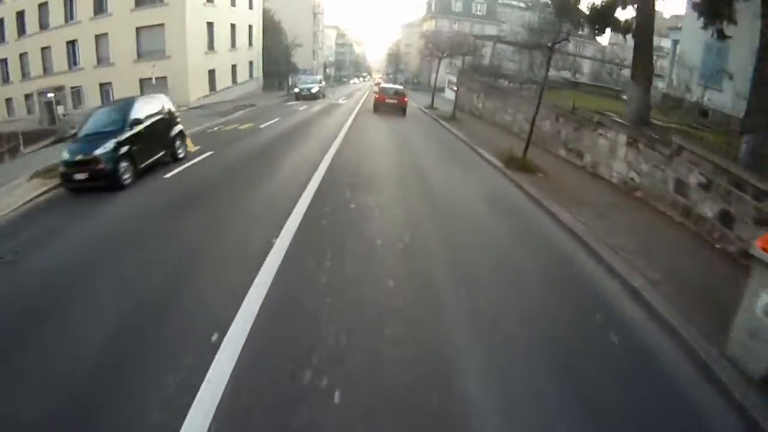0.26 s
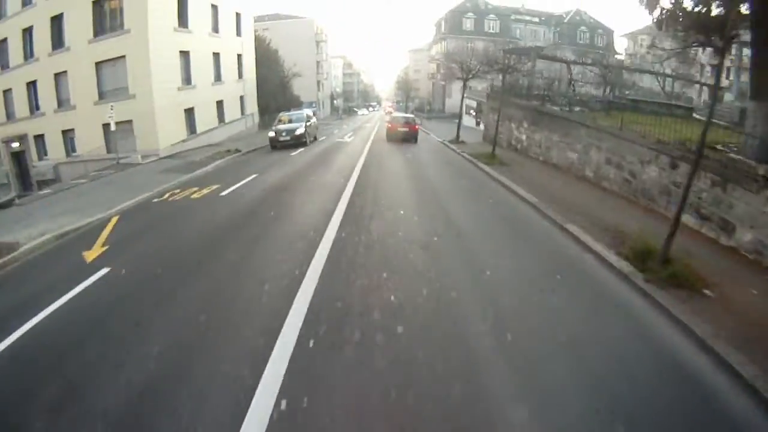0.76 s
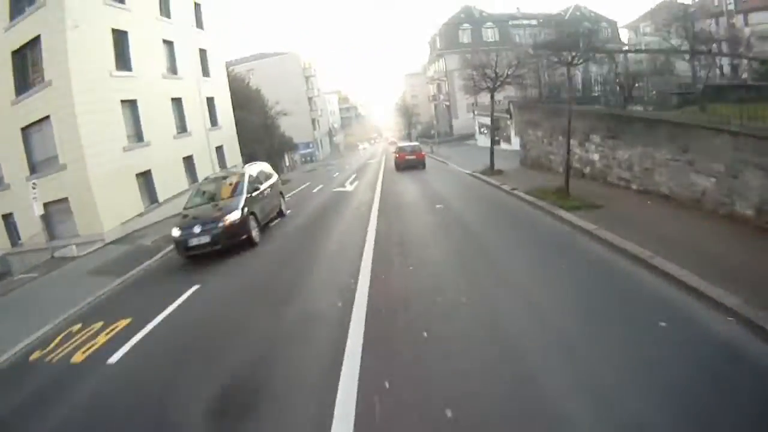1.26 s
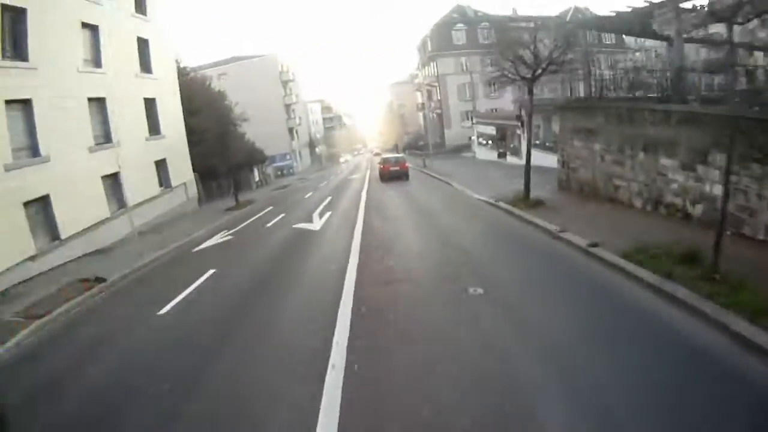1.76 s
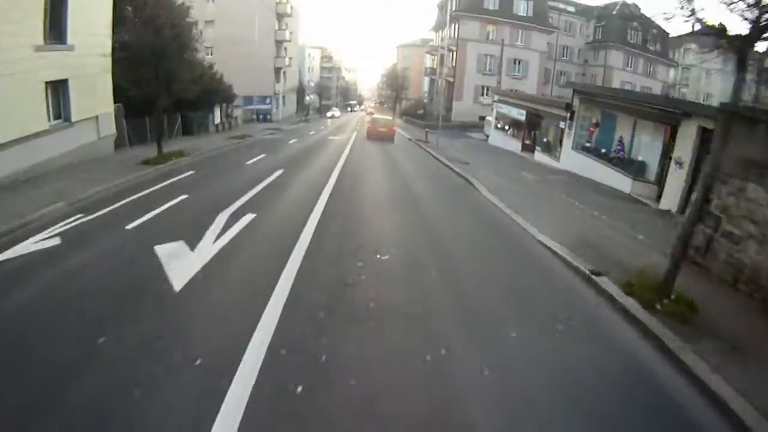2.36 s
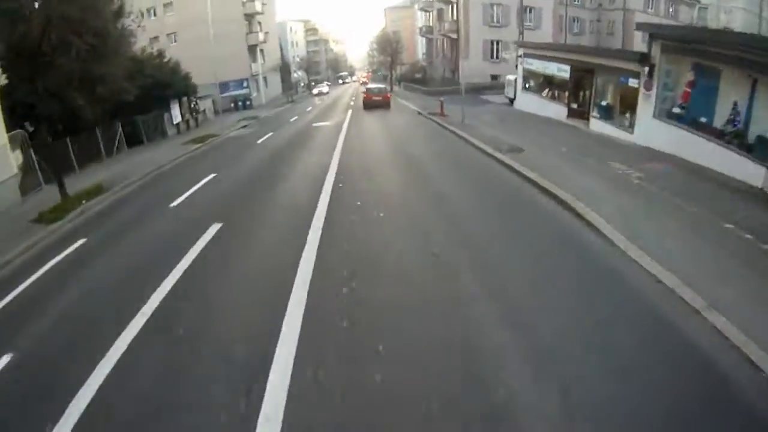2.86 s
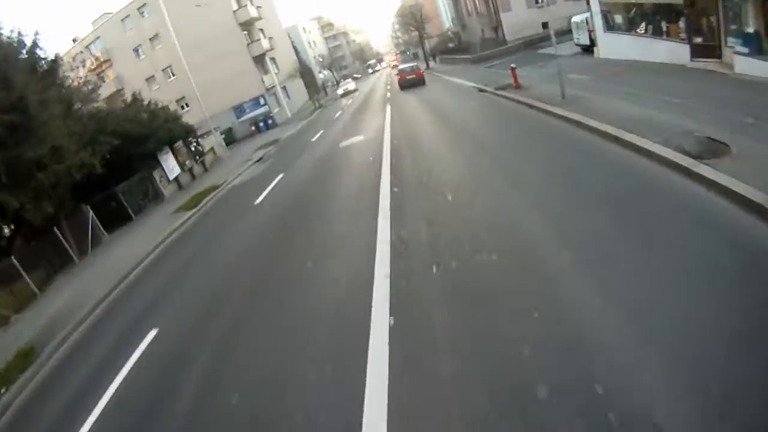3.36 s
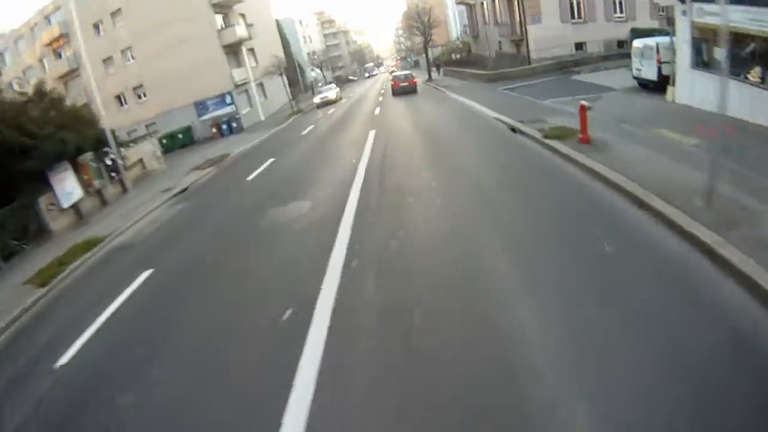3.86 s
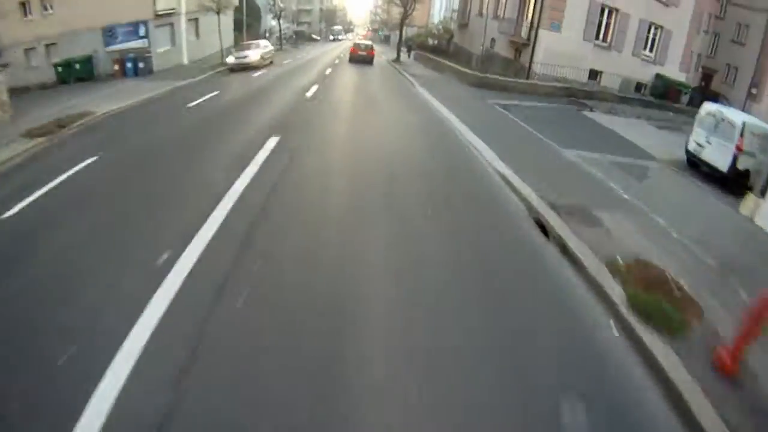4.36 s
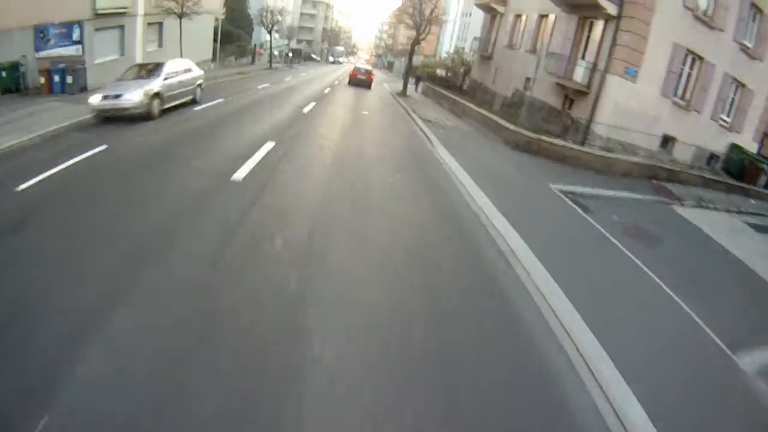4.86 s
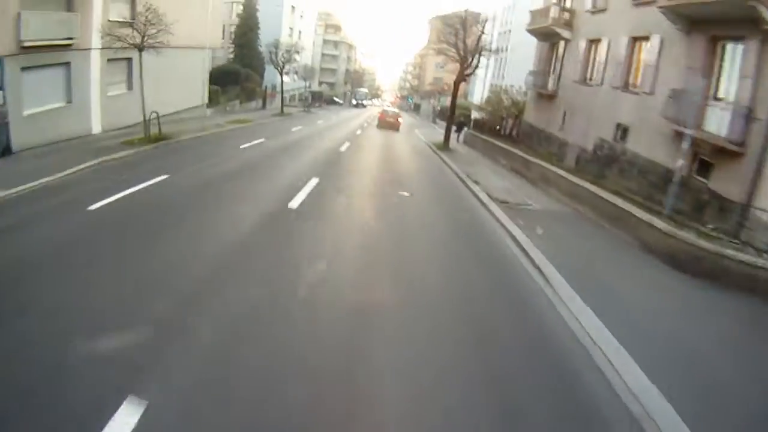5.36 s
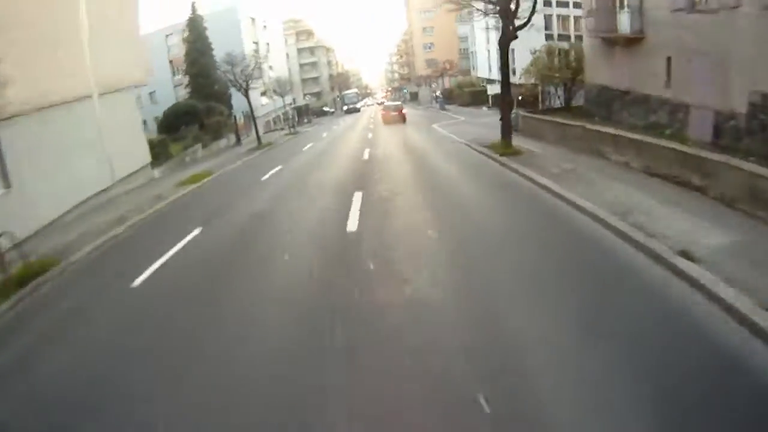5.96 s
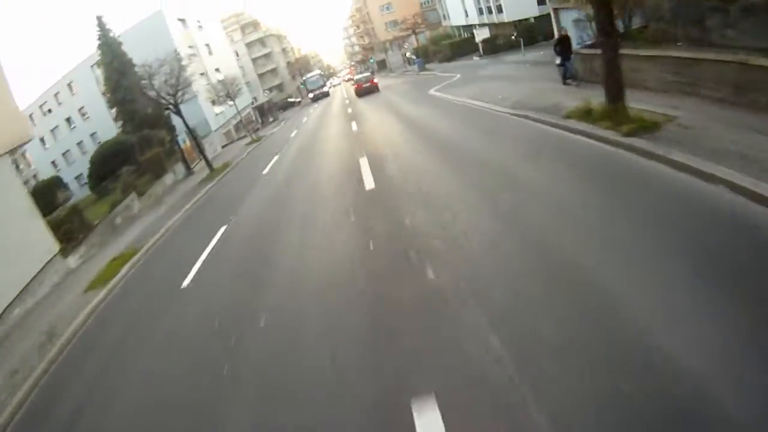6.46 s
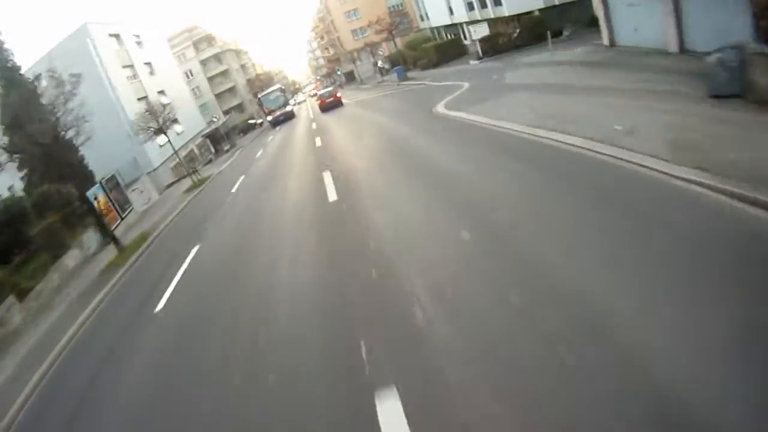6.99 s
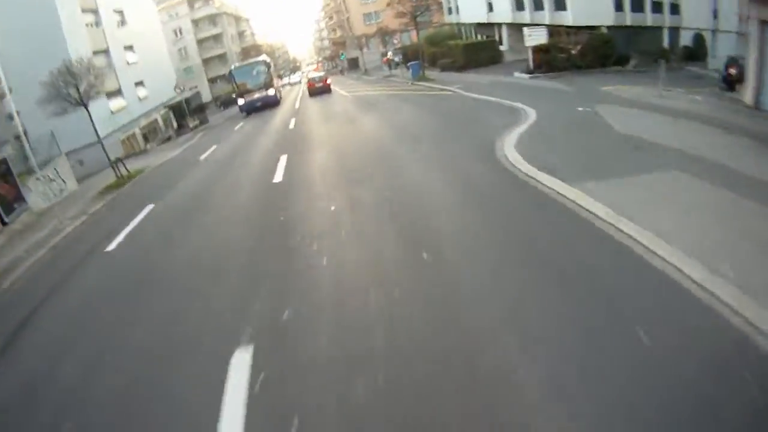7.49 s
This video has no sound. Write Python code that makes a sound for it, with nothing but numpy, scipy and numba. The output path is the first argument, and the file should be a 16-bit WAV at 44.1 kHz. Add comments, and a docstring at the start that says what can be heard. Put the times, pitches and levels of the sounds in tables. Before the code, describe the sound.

A continuous fast ride on small hard wheels down an open city street, heard through a closed case on the rider's helmet. Boxy, low wind buffeting fills the whole stretch, with a thin hiss of wheels on asphalt and a faint fuzzy whistle that slowly fades. Two plastic knocks rattle at about 0.2 s, more near 1.1 s. The wheel hiss grows after 1 s, and a traffic roar swells and sinks around 2 s. A dull, strong knock lands at 2.7 s. Gusts punch from 2.8 s, the hardest at 3.35 s, then 4.6 and 4.85 s, briefly ducking the sound. Rattles crowd together from 5 to 5.5 s; the loudest clack hits at 6.05 s. Fainter traffic swells come near 5.7 and 7.25 s. Wheel hiss strengthens around 6.3 to 6.6 s, and several gusts thump near 7.5 s before the wind eases at the end.

```python
"""Wind buffets a closed camera case on the helmet of a skater rolling fast down an asphalt street.
It is shaped noise plus single pushes for hard gusts; air past a slit adds a fuzzy, fading whistle.
Wheels and swells of traffic roar are noise hissing through the case; the loose mount rattles as ringing blows.
Loud peaks, as in hard gusts, pull the gain control down.
The converter holds every sample, which mirrors the sound in the treble."""
import sys
import numpy as np
from scipy import signal
from scipy.io import wavfile
from scipy.ndimage import uniform_filter1d
from numba import njit

SR = 44100
rng = np.random.default_rng(int(sys.argv[2]) if len(sys.argv) > 2 else 0)


def pcm_store(signal):
    """Save signal as 16-bit PCM."""
    levels = np.round(np.clip(np.atleast_2d(signal), -1, 1) * 32767)
    wavfile.write(sys.argv[1], SR, levels.astype(np.int16).T)


def makeup_ratio(level_db):
    """Linear amplitude ratio for a level in decibels (20 dB per factor of ten)."""
    decades = np.asarray(level_db, float) / 20
    return 10 ** decades


N = 340893  # length of the scene in samples


def read(points, hz):
    """Reads a spectrum table at any pitch, with straight lines over log frequency."""
    table_hz, value = np.transpose(points)
    return np.interp(np.log(hz + 1), np.log(table_hz + 1), value)


def evened(x):
    """Scales a signal to an rms (average strength) of 1."""
    return x / np.sqrt(np.mean(x ** 2) + 1e-20)


def add(mix, s, sound):
    """Mixes a sound in, starting at s seconds."""
    part = mix[max(round(s * SR), 0):][:len(sound)]
    part += sound[:len(part)]


def noise(spectrum, patchy_db, lumpy_db, lump_s):
    """Random short-time spectra with drifting patches, times lumps of loudness shared by all pitches."""
    frames, hz = N // 256 + 5, np.fft.rfftfreq(1024, 1 / SR)
    real, imaginary, patches = rng.standard_normal((frames, 513, 3)).T
    patches = uniform_filter1d(patches, size=8, axis=0)  # smooth over pitch
    patches = evened(uniform_filter1d(patches, size=10, axis=1))  # smooth over time
    level_db = read(spectrum, hz)[:, None] + patchy_db * patches
    spectra = (real + 1j * imaginary) * makeup_ratio(level_db)
    hiss = signal.istft(spectra, nperseg=1024, noverlap=768)[1][:N]
    smoothing = np.poly([np.exp(-1 / (lump_s * SR))] * 2)
    lumps = evened(signal.lfilter([1], smoothing, rng.standard_normal(N)))
    return evened(hiss * makeup_ratio(lumpy_db * lumps))


def ride(index):
    """How one level column of the ride moves over time, as a gain."""
    # the ride: (time [s], wind pressure on the case [dB], wheel hiss [dB])
    ride_rows = [(0.0, -20, -37), (0.39, -19, -37.5), (0.82, -16.5, -36), (1.38, -16, -32),
                 (2.07, -18, -32), (2.88, -16.5, -32.5), (3.31, -18, -34.5), (3.51, -14.5, -35),
                 (3.72, -18.5, -37), (4.5, -16.5, -34.5), (5.06, -16.5, -37), (5.47, -16.5, -35),
                 (6.29, -15.5, -31), (6.61, -13, -31), (6.8, -18, -36), (7.28, -13, -33),
                 (7.47, -15, -35.5), (7.6, -21.5, -44)]
    columns = np.transpose(ride_rows)
    return makeup_ratio(np.interp(np.arange(N) / SR, columns[0], columns[index]))


def wind():
    """Eddies beat on the case; the hardest are single pushes with suction around them."""
    # shape of the buffeting noise: (frequency [Hz], level [dB per Hz])
    buffet = [(15, -12), (40, -1.5), (80, -0.5), (160, -5), (300, -9), (520, -12), (650, -16.5), (780, -25),
              (1000, -32.5), (2000, -55), (6000, -66)]
    # spells when large eddies swell or fail: (middle [s], half-length [s], change of deep rumble [dB])
    eddies = [(0.547, 0.31, 5.5), (2.07, .2, -2), (3.31, 0.083, 8), (4.154, 0.11, -14), (6.0, .3, -3.5),
              (5.001, 0.16, 7), (6.6, 0.099, -9), (7.303, 0.17, -1)]
    # hard gusts: (time [s], pressure [signed amplitude], half-width [ms], suction before [share])
    gusts = [(0.8119, 0.7, 2.1, .3), (2.8086, 0.66, 1.6, .3), (3.1033, .5, 4.1, 0.16),
             (3.2048, 1.16, 1.34, .3), (3.3473, 4.5, 1.73, 0.11), (3.732, 0.3, 1.9, 0.45),
             (4.517, 1.07, 2.35, 0.7), (4.5932, 2.5, 1.67, .1), (4.8471, 2, 1.66, 0.34),
             (5.2317, 0.86, 1.8, 0.34), (5.37, 0.6, 1.5, .1), (6.3107, 1, 2.4, 0.21),
             (6.8226, 1.05, 1.6, 0.52), (7.166, -0.4, 1.4, .3), (7.502, 0.67, 1.8, 0.32),
             (7.5284, -1.1, 1.74, 0.73), (7.561, 0.9, 2.1, .58), (7.675, 1, 1.57, 0.42)]

    out = ride(index=1) * noise(buffet, patchy_db=1.0, lumpy_db=0.5, lump_s=0.0051)
    low_pass = signal.butter(2, 90, fs=SR, output="sos")
    rumble = signal.sosfilt(low_pass, out)
    now = np.arange(N) / SR
    deep_db = sum(db * np.exp(-((now - s) / span) ** 2) for s, span, db in eddies)
    out = out + (makeup_ratio(deep_db) - 1) * rumble  # large eddies come and go on their own

    t = np.arange(-SR // 50, SR // 20) / SR
    for s, pressure, width_ms, before in gusts:
        u = t / width_ms * 1000  # time counted in gust widths
        push = np.exp(-u ** 2)
        suction = before * np.exp(-(u + 1.71) ** 2)
        # the membrane swings back: a soft start, then a slow return
        swing = 0.32 * np.exp(-np.maximum(u - 1.6, 0) / 5.3) / (1 + np.exp(-3 * (u - 1.6)))
        add(out, s + t[0], pressure * (push - suction - swing))
    return out


def whistle():
    """Air past a slit of the case blows a fuzzy tone that slowly fades."""
    hz, width_hz = 2150, 260
    start_db, fade_db_per_s = -40, -1.4
    slit = [(hz - 2 * width_hz, -30), (hz - width_hz / 2, -3), (hz, 0),
            (hz + width_hz / 2, -3), (hz + 2 * width_hz, -30)]
    level = makeup_ratio(start_db + fade_db_per_s * np.arange(N) / SR)
    return level * noise(slit, patchy_db=2.4, lumpy_db=1.0, lump_s=0.0048)


def road():
    """Small hard wheels hiss on the grain of the asphalt."""
    # wheel hiss as it comes through the case: (frequency [Hz], level [dB per Hz])
    wheel_hiss = [(470, -22), (800, -4.5), (1070, -8.5), (1370, -7), (1610, -9.5), (2200, -8.5), (2520, -8),
                  (3010, -4), (3550, -12.5), (3750, -10), (4000, -18.5), (5030, -19.5), (5510, -22),
                  (6000, -30), (7800, -64)]
    return ride(index=2) * noise(wheel_hiss, patchy_db=0.77, lumpy_db=1.04, lump_s=0.012)


def knock(db, bright_db, chance):
    """A scraping blow a few ms long rings the modes (natural tones) of the case."""
    # case modes: (frequency [Hz], level [dB], time to fall 60 dB [s], share of the brightness [factor])
    case_modes = [(1037, -6, 0.018, 1.5), (1334, 3, 0.015, 0.55), (1950, -4.5, 0.011, 1.15),
                  (2408, 4, 0.0071, 1.14), (3150, -8, 0.011, 1.14), (3740, -13, 0.0059, 0.83),
                  (4330, -19.5, 0.022, 0.83)]
    detune = 0.027  # typical pitch shift as a share: no two blows flex the case quite alike
    t = np.arange(len(chance)) / SR
    u = t / 0.0024
    blow = chance * u * np.exp(-2.5 * u)
    out = np.zeros(len(t))
    for k, (hz, mode_db, t60, share) in enumerate(case_modes):
        # each mode builds up before it dies away
        swell = makeup_ratio(-60 * t / t60) * (1 - np.exp(-t / (0.13 * t60)))
        bent_hz = hz * (1 + detune * chance[-1 - k])
        tone = swell * np.sin(2 * np.pi * bent_hz * t)
        ring = signal.fftconvolve(blow, tone)[:len(t)]
        out += makeup_ratio(mode_db + share * bright_db) * ring / abs(ring).max()
    return makeup_ratio(db) * out


def mount():
    """The loose mount gives clear knocks with one rebound each, and faint random ones between them."""
    # clear knocks: (time [s], level [dB], brightness [dB])
    knocks = [(0.1944, -8.5, -10), (0.2593, -10.5, -11.5), (0.572, -22.5, -10), (1.0027, -20.5, -4.5),
              (1.0644, -12, -14), (1.1094, -24, -10), (1.1523, -26, -15), (1.392, -16, -8),
              (1.7414, -17, -10), (1.8951, -16.5, -8), (1.9782, -21.5, -5), (2.1328, -25, 3.5),
              (2.4198, -15.5, -2.5), (2.4412, -26.5, 1), (2.5014, -22.5, 1.5), (2.509, -21, -5),
              (2.6433, -10.5, -21), (2.673, -5, -23), (2.952, -21.5, -1), (2.96, -22.5, 4),
              (3.02, -26, -12), (3.0747, -26, -4), (3.081, -24.5, -2), (3.3194, -30, -3), (3.326, -23, -4),
              (3.8382, -20, -8), (4.338, -20, -11), (4.358, -26, -5), (4.5628, -20, -7), (4.805, -17.5, -4),
              (4.874, -19, -2.5), (5.0053, -18.5, -4.5), (5.0405, -17, -17), (5.077, -22.5, -5),
              (5.114, -16.5, -7.5), (5.1987, -13, -11), (5.2967, -16.5, 3), (5.2985, -11, -8),
              (5.3097, -17, -12), (5.325, -24, 3.5), (5.341, -20, -7), (5.3613, -18, -5.5),
              (5.4871, -12.5, -5.5), (5.513, -21, -10.5), (5.6622, -14, -15), (5.894, -16, -7),
              (5.9165, -22.5, 0), (5.9748, -21, -10), (6.044, -0.5, -11), (6.076, -19, -12),
              (6.138, -19, -4.5), (6.159, -21, -7), (6.2432, -23, -6), (6.3633, -16, -9.5),
              (6.8054, -21.5, -0.5), (6.8708, -12, -3.5), (7.011, -26, -18), (7.653, -32, -4.5),
              (7.701, -23, -14)]
    jitters_per_s, faintest_db = 25, -41
    rebound_s, rebound_db, rebound_bright_db = 0.0065, -14, 0.5  # start after table time, level, brightness
    blow_samples = 1200
    out, count = np.zeros(N), round(jitters_per_s * N / SR)

    places, tints = rng.random((2, count))
    sizes = rng.exponential(size=count)
    chances = rng.standard_normal((count, blow_samples))
    for place, tint, size, chance in zip(places, tints, sizes, chances):
        jitter_db = faintest_db + 3.9 * min(size, 2.5)
        add(out, place * N / SR, knock(jitter_db, -7.0 + 9 * tint, chance))

    pairs = rng.standard_normal((len(knocks), 2, blow_samples))
    for (s, db, bright_db), (first, second) in zip(knocks, pairs):
        add(out, s - 0.0013, knock(db, bright_db, first))  # starts a little early: a blow takes time to build
        add(out, s + rebound_s, knock(db + rebound_db, bright_db + rebound_bright_db, second))
    return out


def traffic():
    """Traffic roar that swells, holds and sinks again."""
    # swells of traffic roar: (time when loudest [s], level [dB], time from loudest to half amplitude [s])
    roar_swells = [(2.05, -30.5, 0.2), (5.7, -38.5, 0.26), (7.25, -39, 0.22)]
    # shape of the tyre roar: (frequency [Hz], level [dB per Hz])
    tyre_roar = [(470, -33), (800, -14), (1330, -6), (1710, -10), (2860, 0), (3620, -15), (4300, -10.5),
                 (5000, -12.5), (6000, -21), (7800, -56)]
    t = np.arange(N) / SR
    gain = sum(makeup_ratio(db) / (1 + ((t - s) / span) ** 4) for s, db, span in roar_swells)
    return gain * noise(tyre_roar, patchy_db=0.5, lumpy_db=-0.5, lump_s=0.0062)


def scene():
    """Everything that reaches the microphone."""
    return (wind() + whistle() + road() + mount() + traffic())[None]


@njit
def levelled(x, limit, fall, rise):
    """The gain steps down while the output is over the limit and creeps back otherwise."""
    out, gain = np.empty_like(x), 1.
    for i in range(len(x)):
        out[i] = gain * x[i]
        if abs(out[i]) > limit:
            gain = gain * fall
        else:
            gain = min(gain * rise, 1.)
    return out


def held_samples(x):
    """Takes 12000 samples a second and holds each flat until the next, which mirrors sound in the treble."""
    slow = signal.resample_poly(x, 40, 147, window=("kaiser", 8.))
    held = np.repeat(slow, 4)  # now 48000 steps a second
    return signal.resample_poly(np.r_[held, np.zeros(8)], 147, 160)[:N]  # back to SR


def top_cut(x):
    """Nothing passes above the cut-off."""
    return signal.sosfilt(signal.butter(12, 16620, fs=SR, output="sos"), x)


def record(dry):
    """Gain control, a converter that clips and holds its samples, and a band limit."""
    fall_db_per_s, rise_db_per_s = 3500, 60
    x = levelled(dry[0], 0.48, makeup_ratio(-fall_db_per_s / SR), makeup_ratio(rise_db_per_s / SR))
    x = np.clip(x, -0.93, 0.93)  # the converter's full scale
    x = held_samples(x)
    band_limit = signal.firwin(301, 15280, window=("kaiser", 2), fs=SR)
    x = signal.oaconvolve(x, band_limit, "same")
    return top_cut(x[None])


dry = scene()
out = record(dry)
pcm_store(out)
```